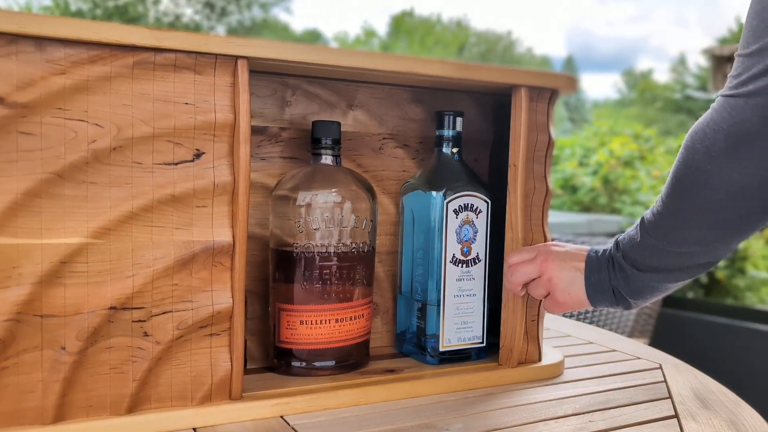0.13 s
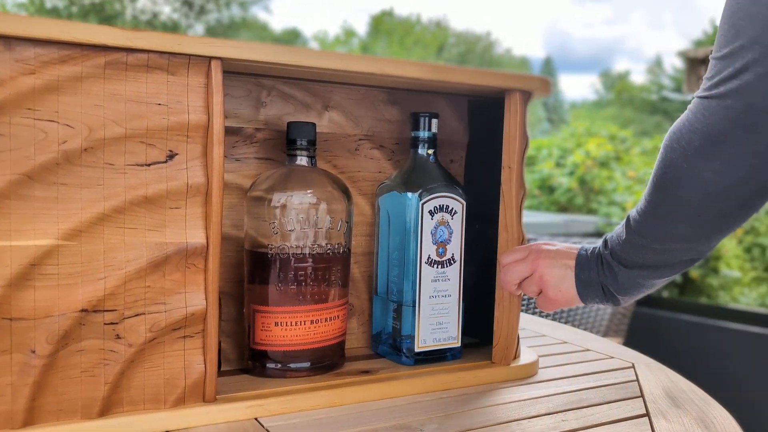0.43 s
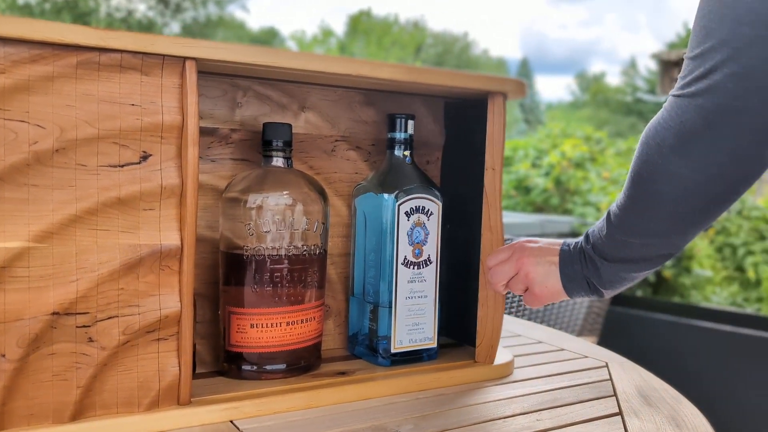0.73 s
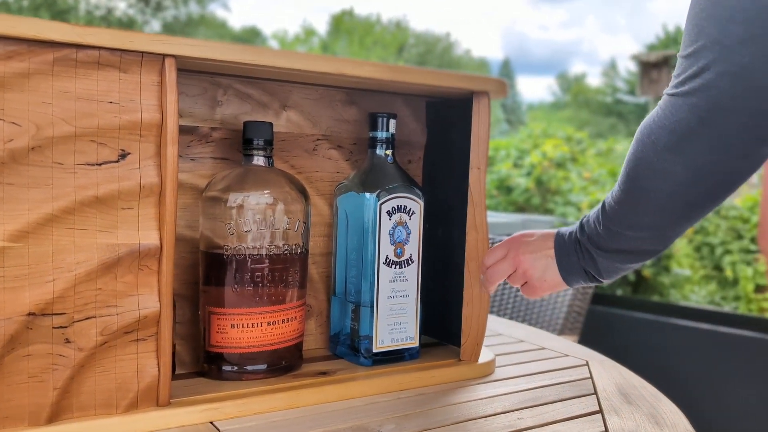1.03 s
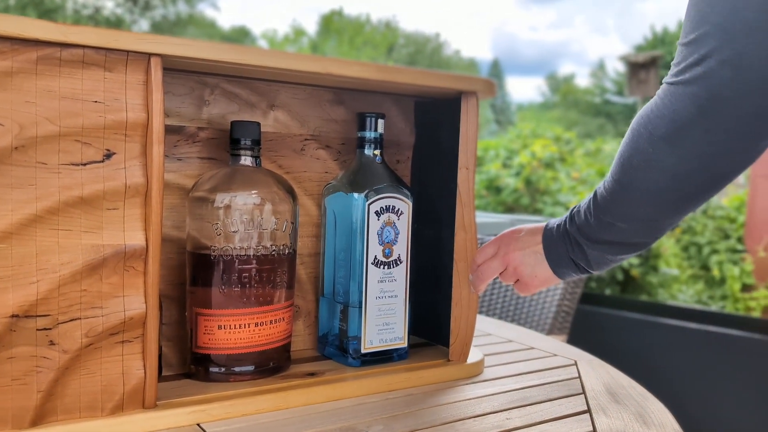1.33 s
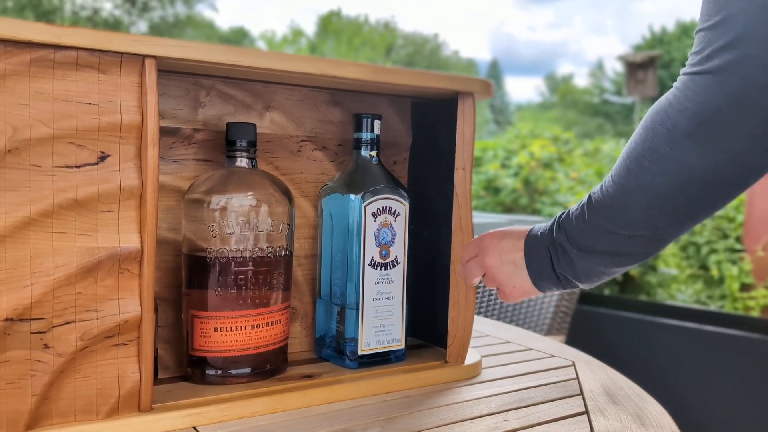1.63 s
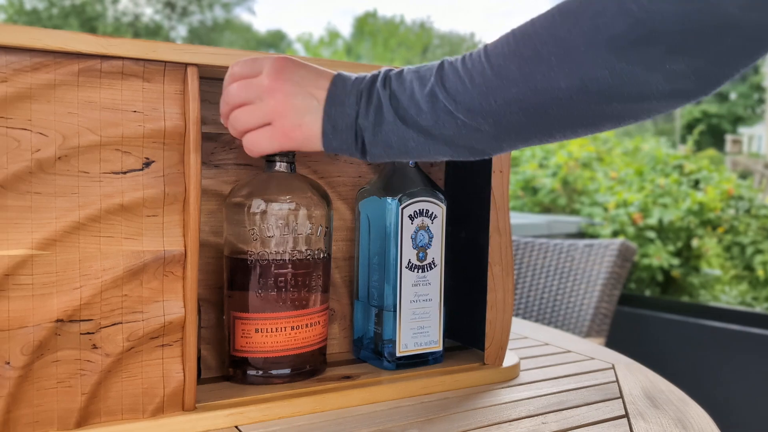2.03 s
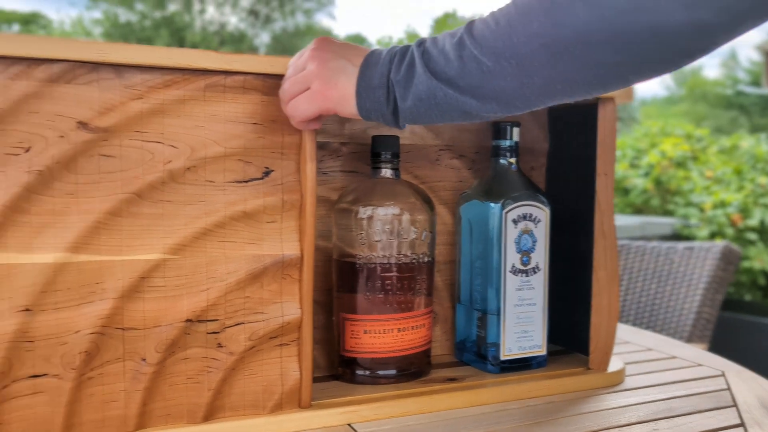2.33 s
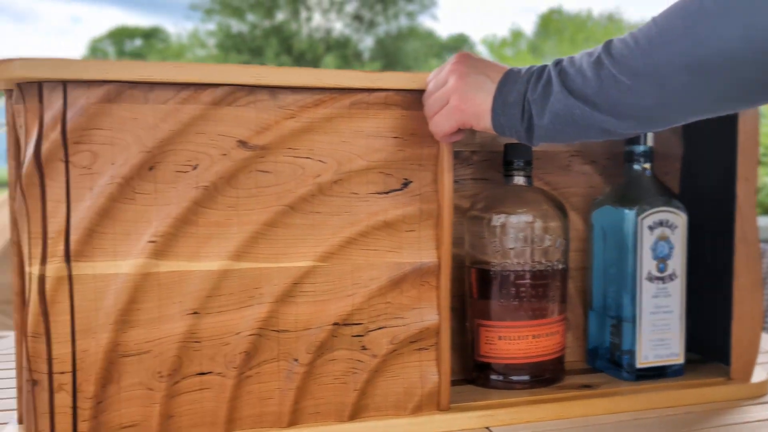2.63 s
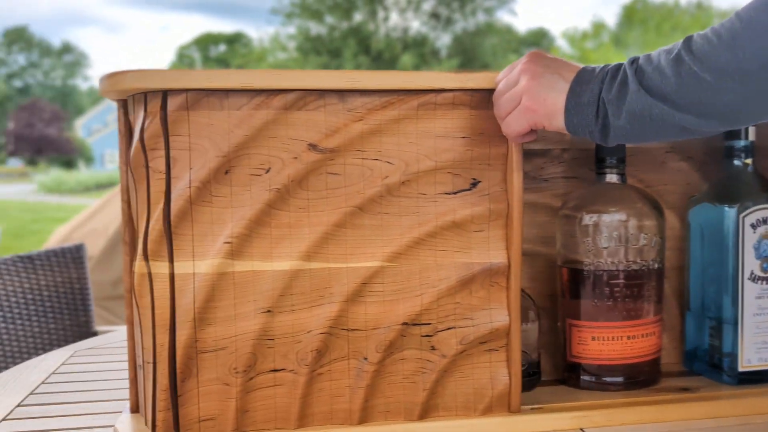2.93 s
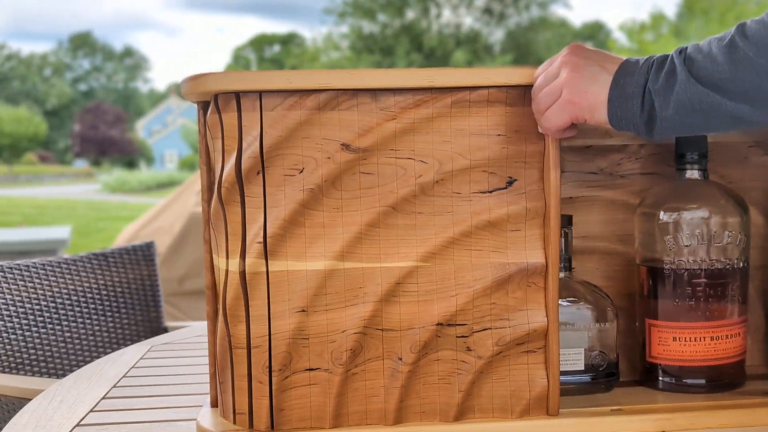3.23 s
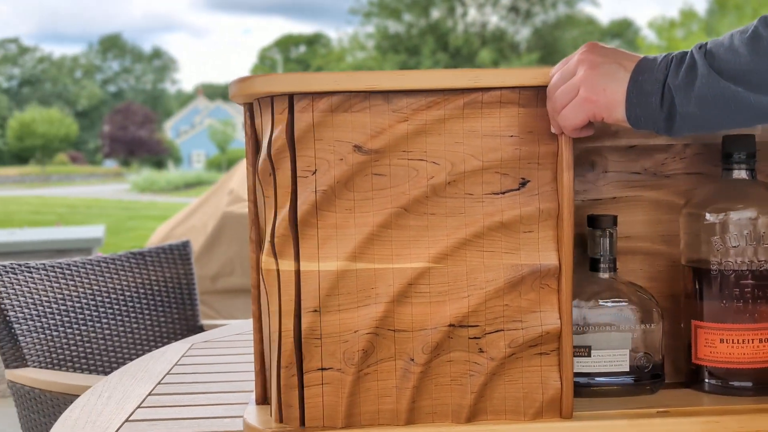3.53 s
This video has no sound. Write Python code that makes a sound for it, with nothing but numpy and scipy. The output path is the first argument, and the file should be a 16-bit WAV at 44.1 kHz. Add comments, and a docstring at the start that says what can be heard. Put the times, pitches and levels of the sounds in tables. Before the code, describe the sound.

A wooden slatted door scrapes and knocks in two short pushes, pauses while birds chirp faintly, then slides again with louder hollow rumbling. Close stereo microphone on an open patio, with soft outdoor air.

```python
"""Sliding a slatted cabinet door

A wooden tambour door on a patio gets two short pushes, a pause, then a firmer pull. Streams of tiny random
impacts make the slats rub in their groove and bump the hollow case; single knocks, a tick and squeaks are added.
A sleeve brushes softly between. Behind are gliding bird notes, insects made of noise bands, air and a low drone."""
import sys
import numpy as np
from scipy import signal
from scipy.fft import rfft, irfft, next_fast_len
from scipy.io import wavfile
from scipy.ndimage import uniform_filter1d

SR = 44100
rng = np.random.default_rng(int(sys.argv[2]) if len(sys.argv) > 2 else 0)


def store_wav(level_fs):
    """Save 16-bit WAV to argv[1]."""
    pcm = np.round(np.clip(np.atleast_2d(level_fs), -1, 1) * 32767)
    wavfile.write(sys.argv[1], SR, pcm.T.astype(np.int16))


N = 161847  # length of the scene in samples


def undb(db):
    """Turn decibels into gain."""
    return 10 ** (np.asarray(db) / 20)


def unit(x):
    """Scale a sound to an average strength (rms) of one."""
    return x / np.sqrt(np.mean(x ** 2) + 1e-20)


def over_hz(points, size):
    """Join (pitch_hz, value) points on a log pitch axis, at the bins of a sound of this size."""
    hz, value = np.array(points, float).T
    bin_hz = np.arange(size // 2 + 1) * SR / size
    return np.interp(np.log(bin_hz + 1), np.log(hz), value)


def colour(x, points):
    """Make some pitches louder or softer, following a (pitch_hz, level_db) curve."""
    size = next_fast_len(x.shape[-1] + 2048)
    spectrum = rfft(x, size) * undb(over_hz(points, size))
    return irfft(spectrum, size)[..., :x.shape[-1]]


def pair(x, likeness):
    """Blend two unrelated signals into a left and right that are alike to a given degree at each pitch."""
    size = next_fast_len(N + 2048)
    alike = np.clip(over_hz(likeness, size), -.999, .999)
    mid, side = rfft(x, size) * np.sqrt([1 + alike, 1 - alike])
    return irfft(np.array([mid + side, mid - side]), size)[:, :N] / np.sqrt(2)


def band(x, hz, width_hz):
    """Pass a sound through one resonance, with a gain of one at its centre."""
    return signal.lfilter(*signal.iirpeak(hz, hz / width_hz, fs=SR), x)


def curves(table):
    """Turn rows of (time_s, level_db, ..) into gains over time, silent outside the rows."""
    times, *levels = np.array(table, float).T
    t = np.arange(N) / SR
    return [undb(np.interp(t, times, db, left=-200, right=-200)) for db in levels]


def walk(hz):
    """Wander smoothly at random, heading for a new value this many times a second, with a spread near one."""
    step = max(int(SR / hz), 1)
    held = rng.standard_normal(N)[np.arange(N) // step]
    return unit(uniform_filter1d(held, step))


def fade(t, t60):
    """Die away exponentially, dropping 60 dB in t60 seconds."""
    return np.exp(-np.log(1000) * t / t60)


def add(out, x, start):
    """Mix a sound in at a time in seconds."""
    i = int(np.clip(start * SR, 0, N - 1))
    out[:, i:i + x.shape[-1]] += x[..., :N - i]


def grains(per_s, spread_db):
    """Make two streams of tiny random impacts, of uneven size when spread_db is above zero."""
    size = undb(spread_db * np.minimum(rng.exponential(size=(2, N)), 5))
    hits = rng.random((2, N)) < per_s / SR
    sign = np.sign(rng.standard_normal((2, N)))
    return unit(hits * size * sign)


# How the door moves in the pushes and in the pull
# columns: time_s, case_rumble_db, slat_scrape_db, groove_hiss_db
PUSH_MOVES = [(0, -41, -53, -59.5), (.1, -50, -56.5, -64), (.27, -54, -57, -63), (.37, -55, -54.5, -62),
              (.42, -51, -57.5, -64), (.5, -58, -58, -67), (.57, -71, -75, -82), (.68, -54.5, -66.5, -102),
              (.78, -68, -63.5, -75.5), (.885, -47.5, -56.5, -63), (.93, -49.5, -67, -89),
              (1.1, -84, -78, -100), (1.2, -77, -96, -98)]
PULL_MOVES = [(2.8, -64, -71, -72), (2.83, -50, -61.5, -65), (2.93, -50.5, -57.5, -68.5),
              (3.0, -42, -55, -68), (3.08, -45.5, -55, -70), (3.18, -38, -56, -69.5),
              (3.3, -43.5, -53.5, -68), (3.38, -44.5, -56.5, -68), (3.465, -42, -52.5, -66),
              (3.495, -38, -55.5, -53), (3.53, -37.5, -50.5, -72), (3.58, -43.5, -66, -74),
              (3.63, -39, -53.5, -64), (3.655, -43, -43, -53), (3.68, -33, -51, -63)]
# Resonances of the groove; columns: pitch_hz, width_hz, relative_level_db
GROOVE_RESONANCES = [(787, 23, -1), (1669, 44, 0.5), (1805, 88, -3.5), (2210, 110, -6), (3080, 120, 0.5),
                     (3318, 76, 0.5), (4310, 49, -10), (5100, 50, -11), (6040, 190, -10.5)]
# Tone of the rubbing slats and of the fine hiss; columns: pitch_hz, relative_level_db
PUSH_SCRAPE_TONE = [(250, -1), (450, 5.5), (900, -2.5), (1200, 0), (1450, -9.5), (1800, -3), (2250, -6),
                    (2650, -4.5), (3300, -12.5), (4500, -14.5), (8000, -21)]
PUSH_HISS_TONE = [(2000, -16), (3500, -3), (4300, 0.5), (6000, 0), (7000, -4), (9500, -7), (11500, -4),
                  (13500, -13), (16000, -18)]
PULL_SCRAPE_TONE = [(250, -9), (450, 1), (850, 0), (1300, -3.5), (1800, -5), (2600, -12), (3300, -17.5),
                    (4500, -13.5), (8000, -35)]
PULL_HISS_TONE = [(2000, -17), (3500, 3.5), (4200, -2.5), (6000, 4), (7000, -2), (9500, -3), (11500, -2),
                  (13500, -10), (16000, -17)]
# How alike left and right are for the door sounds; columns: pitch_hz, likeness (no unit, held below 1)
DOOR_LIKENESS = [(60, 1.8), (200, 0.8), (400, 0.85), (700, 0.85), (1200, 0.2), (16000, 0)]
BUMPS_PER_S, BUMP_SPREAD_DB = 460, 2
GRAINS_PER_S, GRAIN_SPREAD_DB = 5000, 0
HISS_GRAINS_PER_S, HISS_SPREAD_DB = 14000, 2.1
GROOVE_FLICKER_HZ, GROOVE_FLICKER_DB = 24.73, 4
JUDDER_HZ, JUDDER_DB = 45.37, 1


def slide(movement, modes, scrape_colour, hiss_colour, groove_db):
    """Slats bump the case and rub in the groove, in an uneven judder of stick and slip."""
    rumble_gain, scrape_gain, hiss_gain = curves(movement)
    judder = undb(JUDDER_DB * walk(JUDDER_HZ))

    # every bump sets the whole case ringing
    case_ring = modes.sum(0)
    bumps = signal.fftconvolve(grains(BUMPS_PER_S, BUMP_SPREAD_DB), case_ring[None])[:, :N]

    rub = grains(GRAINS_PER_S, GRAIN_SPREAD_DB) * judder
    groove = np.zeros((2, N))
    for hz, width_hz, db in GROOVE_RESONANCES:
        flicker_db = GROOVE_FLICKER_DB * walk(GROOVE_FLICKER_HZ)
        groove += undb(db + flicker_db) * band(rub, hz, width_hz)
    slats = unit(colour(rub, scrape_colour)) + undb(groove_db) * unit(groove)

    # the fine hiss follows the judder more weakly
    fine_grains = grains(HISS_GRAINS_PER_S, HISS_SPREAD_DB) * judder ** .5
    hiss = unit(colour(fine_grains, hiss_colour))
    return pair(rumble_gain * unit(bumps) + scrape_gain * slats + hiss_gain * hiss, DOOR_LIKENESS)


# Ringing modes of the hollow case
# columns: pitch_hz, t60_s, relative_push_level_db, relative_pull_level_db
CASE_MODES = [(99, 0.094, 0, -8), (136.7, .14, -1.5, 1), (178.3, 0.093, 5, -3.5), (202, 0.15, -2, -3),
              (227.1, 0.12, 2, 1), (261.8, 0.14, -8.5, -1.5), (309, 0.029, 3.5, -8.5),
              (409.8, 0.06, -2, -10.5), (547.4, 0.082, -10.5, -7), (602.5, 0.071, -5, -19.5),
              (783, 0.043, -15, -23), (927, 0.028, -11.5, -17.5), (1060, 0.029, -24, -32)]


def case_modes(pulling):
    """The ring of the case after a tap, a row per mode; the mix depends on where the door stands, push or pull."""
    t = np.arange(SR // 4) / SR
    rows = []
    for k, (hz, t60, push_db, pull_db) in enumerate(CASE_MODES):
        gain = undb(pull_db if pulling else push_db)
        sign = (-1) ** k  # neighbouring modes start in opposite directions
        rows.append(sign * gain * fade(t, t60) * np.sin(2 * np.pi * hz * t))
    return np.array(rows)


KNOCK_WINDOW_S = 0.021


def sized(x, db):
    """Give a short sound the energy that a steady sound of this level has in the knock window."""
    energy = np.mean(np.sum(x ** 2, axis=-1))
    return x * undb(db) / np.sqrt(energy / (KNOCK_WINDOW_S * SR))


# Knocks of the slats; columns: start_s, low_thud_db, hollow_ring_db, crack_db, crack_centre_hz
SLAT_KNOCKS = [(.018, -53, -60, -67, 750), (.072, -43.5, -68, -60, 1200), (0.145, -66, -59, -53, 980),
               (0.185, -42.5, -66, -66, 800), (0.327, -56, -60.5, -61, 1100), (0.356, -46, -67, -72, 1000),
               (.603, -50.5, -69, -55.5, 1270), (0.621, -47.5, -61, -71, 800), (0.6551, -53, -52, -58, 700),
               (.910, -52, -48.5, -54.5, 940), (.921, -57, -51, -58.5, 836), (0.962, -67, -60, -68, 800),
               (1.015, -74, -57.5, -72, 700), (2.464, -59, -67, -67, 900), (2.824, -43, -61, -77, 800),
               (2.879, -43.5, -57.5, -61, 1000), (2.988, -42.5, -54, -54.5, 900),
               (3.17, -52, -62, -73, 800), (3.2243, -33, -42.5, -46.5, 840), (3.278, -40, -53.5, -72, 800),
               (3.315, -37.5, -57, -53, 1650), (3.432, -38, -46, -51.5, 3640),
               (3.504, -35.5, -41.5, -47.5, 2370), (3.607, -38.5, -58, -49.5, 1840),
               (3.625, -42, -49.5, -57, 1520), (3.648, -44, -49.5, -48, 3100)]
# Basic tone of the dry crack; columns: pitch_hz, relative_level_db
CRACK_TONE = [(300, 0), (700, 8), (1400, 2.5), (2200, -4), (3600, -10), (6000, -20.5), (15000, -32.5)]
CRACK_T60_S, CONTACT_S = 0.056, 0.00081
CRACK_PEAK_DB, CRACK_Q = -5.5, 2.7  # the struck slat colours its crack
KNOCK_SCATTER_DB = 3  # each knock favours other modes
THUD_TOP_HZ = 380  # case modes below this make the thud, the others the ring
PULL_FROM_S = 2  # knocks after this time belong to the pull


def knocks():
    """Each knock thuds and rings in the case, with a short dry crack of noise."""
    out, cracks = np.zeros((2, N)), np.zeros((2, N))
    t = np.arange(SR // 4) / SR
    low = np.array(CASE_MODES)[:, 0] < THUD_TOP_HZ
    contact = 1 - np.exp(-t / CONTACT_S)  # a slightly softened start
    for start, thud_db, ring_db, crack_db, crack_hz in SLAT_KNOCKS:
        scatter = undb(KNOCK_SCATTER_DB * rng.standard_normal((len(CASE_MODES), 1)))
        modes = case_modes(pulling=start > PULL_FROM_S) * contact * scatter
        thud = sized(modes[low].sum(0), thud_db)
        ring = sized(modes[~low].sum(0), ring_db)
        add(out, thud + ring, start)

        noise = colour(rng.standard_normal((2, len(t))), CRACK_TONE)
        peak = unit(band(noise, crack_hz, crack_hz / CRACK_Q))
        crack = unit(noise) + undb(CRACK_PEAK_DB) * peak
        add(cracks, sized(crack * fade(t, CRACK_T60_S) * contact, crack_db), start)
    return out + pair(cracks, DOOR_LIKENESS)


TICK_AT_S, TICK_DB, TICK_T60_S = .6545, -67.5, 0.013


def tick():
    """One sharp tick as the door catches: a burst of hissy noise that dies at once."""
    out = np.zeros((2, N))
    t = np.arange(SR // 4) / SR
    burst = colour(rng.standard_normal((2, len(t))), PUSH_HISS_TONE) * fade(t, TICK_T60_S)
    add(out, sized(burst, TICK_DB), TICK_AT_S)
    return pair(out, DOOR_LIKENESS)


# Squeaks where a slat binds; columns: middle_s, half_length_s, pitch_hz, width_hz, level_db
SLAT_SQUEAKS = [(0.364, .12, 2080, 260, -63), (.892, 0.037, 3140, 520, -61), (3.02, 0.057, 834, 40, -54),
                (3.322, .025, 1655, 140, -55)]


def squeaks():
    """A binding slat chatters briefly: tiny impacts excite one resonance."""
    t = np.arange(N) / SR
    out = np.zeros((2, N))
    for middle, half_length, hz, width_hz, db in SLAT_SQUEAKS:
        swell = np.cos(np.pi / 2 * np.clip((t - middle) / half_length, -1, 1)) ** 2
        chatter = band(band(grains(GRAINS_PER_S, 1), hz, width_hz), hz, 2 * width_hz)
        out += undb(db) * swell * unit(chatter)
    return pair(out, DOOR_LIKENESS)


# The sleeve brushes as the hand changes its grip; columns: time_s, level_db
SLEEVE_MOVES = [(1.48, -93), (1.54, -76), (1.66, -89), (1.87, -78), (2.0, -87), (2.14, -77.5), (2.28, -76),
                (2.42, -92)]
# Tone of the cloth; columns: pitch_hz, relative_level_db
SLEEVE_TONE = [(500, -16), (2500, 2), (6000, 1), (11500, 0.5), (16000, -13)]


def sleeve():
    """Cloth brushes on cloth, faint and finely grained: many tiny impacts, coloured."""
    gain = curves(SLEEVE_MOVES)[0]
    return gain * unit(colour(grains(per_s=9000, spread_db=3.0), SLEEVE_TONE))


# Bird notes; columns: start_s, length_s, start_hz, end_hz, relative_level_db, buzz (share of the pitch)
BIRD_NOTES = [(1.18, .07, 7300, 7650, -83, .035), (1.24, 0.13, 7800, 7750, -75.5, .035),
              (1.4, 0.16, 4540, 4730, -66, 0.021), (1.43, .2, 4290, 4390, -63.5, .01),
              (1.51, 0.11, 5150, 5106, -62.5, 0.015), (2.01, 0.128, 4450, 4350, -61, 0.042),
              (2.08, .12, 4110, 3250, -67.5, 0.069), (2.903, 0.023, 2943, 3340, -54, 0.028),
              (2.91, 0.036, 4050, 4220, -57, 0.033)]
FLUTTER_HZ, FLUTTER_DB = 37.2, 1.5
BIRDS_DIRECT_DB, GARDEN_T60_S, GARDEN_WET_DB = -5.5, 0.61, -1


def birds():
    """Gliding tones with a random buzz in pitch and a flutter in level, smeared by the trees."""
    out, waver = np.zeros((2, N)), walk(500)
    for start, length, from_hz, to_hz, db, buzz in BIRD_NOTES:
        u = np.linspace(0, 1, int(length * SR))  # progress through the note
        glide_hz = from_hz + (to_hz - from_hz) * u
        hz = glide_hz * (1 + buzz * np.roll(waver, -int(start * SR))[:len(u)])
        tone = np.sin(2 * np.pi * np.cumsum(hz) / SR)
        flutter_db = FLUTTER_DB * np.sin(2 * np.pi * FLUTTER_HZ * length * u)
        swell = np.sqrt(4 * u * (1 - u))
        add(out, undb(db + flutter_db) * swell * tone, start)

    # fading noise stands for the many echoes from the trees
    trees = rng.standard_normal((2, SR)) * fade(np.arange(SR) / SR, GARDEN_T60_S)
    echoes = signal.fftconvolve(out, unit(trees) / np.sqrt(SR), axes=1)[:, :N]
    return undb(BIRDS_DIRECT_DB) * out + undb(GARDEN_WET_DB) * echoes


def shrill(hz, width_hz):
    """Noise through the same resonance three times, for a band of shrilling."""
    x = rng.standard_normal((2, N))
    for _ in range(3):
        x = band(x, hz, width_hz)
    return unit(x)


# Levels of the insects
# columns: time_s, lower_chorus_db (before its pulsing), upper_chorus_db (before its flicker), broad_shrill_db
INSECT_LEVELS = [(0, -84, -91, -71), (1.15, -98, -97, -74.5), (1.22, -88, -88, -96), (1.35, -93, -85, -96),
                 (1.42, -81, -94, -70.5), (2.1, -72, -85.5, -79.5), (2.6, -69, -78, -78.5),
                 (3.3, -65.5, -69.5, -65), (3.67, -65.5, -75, -78)]
CHIRP_HZ, CHIRP_AT_S, CHIRP_DB = 8.35, 2.51, 3


def insects():
    """Three bands of shrilling noise; the lower chorus pulses about eight times a second, the upper flickers."""
    t = np.arange(N) / SR
    pulse = undb(CHIRP_DB * np.cos(2 * np.pi * CHIRP_HZ * (t - CHIRP_AT_S)))
    flicker = undb(walk(18))
    lower_gain, upper_gain, broad_gain = curves(INSECT_LEVELS)
    broad = broad_gain * shrill(hz=4580, width_hz=2700)
    lower = lower_gain * pulse * shrill(hz=5666, width_hz=1420)
    upper = upper_gain * flicker * shrill(hz=7510, width_hz=1600)
    return broad + lower + upper


# Tone of the garden air; columns: pitch_hz, relative_level_db
AIR_TONE = [(20, -20), (35, 3), (55, 15), (100, 21), (135, 14), (170, 8.5), (240, 7.5), (320, -0.5),
            (550, -0.5), (900, -0.5), (1800, -2.5), (2300, -7.5), (3600, -11.5), (4100, -14.5),
            (6200, -24.5), (7000, -29.5), (9000, -29), (12000, -30.5), (16000, -37)]
# Slow swell of the air; columns: time_s, relative_level_db
AIR_SWELL_LEVELS = [(0, -1), (1.3, -0.5), (1.9, -0.5), (2.5, 1), (3.7, 4.5)]
# How alike left and right are for air and drone; columns: pitch_hz, likeness (no unit, -1 to 1)
GARDEN_LIKENESS = [(60, 0.99), (130, 0.96), (220, 0.82), (400, 0.63), (700, 0.23), (1300, -0.27),
                   (3000, 0.037)]
AIR_DB = -54.5  # before the slow swell
DRONE_HZ, DRONE_WIDTH_HZ, DRONE_DB = 64.1, 15.4, -49
THROB_HZ, THROB_DB = 19, 2.5


def garden():
    """Soft outdoor air of coloured noise, over a low drone of narrow noise that throbs unevenly."""
    air = unit(colour(rng.standard_normal((2, N)), AIR_TONE)) * curves(AIR_SWELL_LEVELS)[0]

    # the first second is dropped so that the resonances have settled
    noise = rng.standard_normal((2, N + SR))
    drone = band(band(noise, DRONE_HZ, DRONE_WIDTH_HZ), DRONE_HZ, 2 * DRONE_WIDTH_HZ)[:, SR:]
    swell = np.abs(signal.hilbert(unit(drone)))
    throb = undb(THROB_DB * walk(THROB_HZ))
    drone = unit(drone / (swell + 1.2) * throb)  # dividing evens out the loudest swells
    drone = colour(drone, [(25, -22), (48, 0)])  # less of the very deepest sound
    return pair(undb(AIR_DB) * air + undb(DRONE_DB) * drone, GARDEN_LIKENESS)


# Balance of the two sides; columns: pitch_hz, left_minus_right_db
SIDE_BALANCE = [(60, -1.8), (700, -0.5), (1300, -3), (2400, -.8), (4400, -4.5), (8000, -4.5), (15000, -3.3)]


def lean(x):
    """Tip the balance between left and right by pitch, half the change on each side."""
    left = colour(x[0], [(hz, db / 2) for hz, db in SIDE_BALANCE])
    right = colour(x[1], [(hz, -db / 2) for hz, db in SIDE_BALANCE])
    return np.array([left, right])


def scene():
    """The door close by, the garden behind, all leaning a little to the right."""
    push = slide(PUSH_MOVES, case_modes(pulling=False), PUSH_SCRAPE_TONE, PUSH_HISS_TONE, groove_db=-4.5)
    pull = slide(PULL_MOVES, case_modes(pulling=True), PULL_SCRAPE_TONE, PULL_HISS_TONE, groove_db=-22)
    door = push + pull + knocks() + tick() + squeaks()
    background = birds() + insects() + garden()
    return lean(door + sleeve() + background)


TOP_HZ = 15750


def record(dry):
    """The recorder cuts the top steeply."""
    top_cut = signal.ellip(12, .1, 80, TOP_HZ, fs=SR, output="sos")
    return signal.sosfilt(top_cut, dry)


dry = scene()
out = record(dry)
store_wav(out)
```